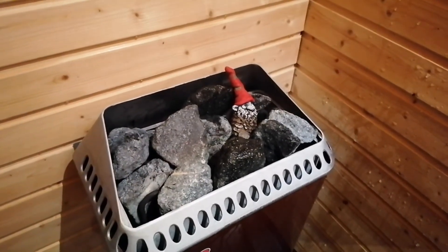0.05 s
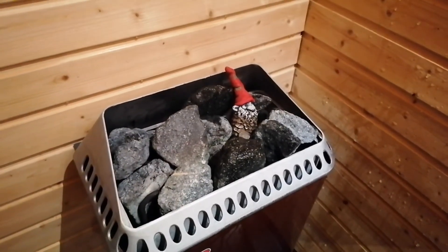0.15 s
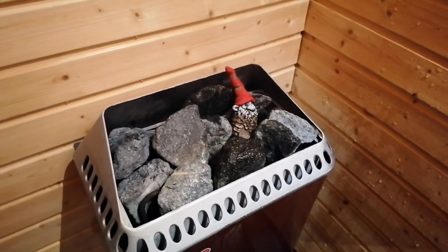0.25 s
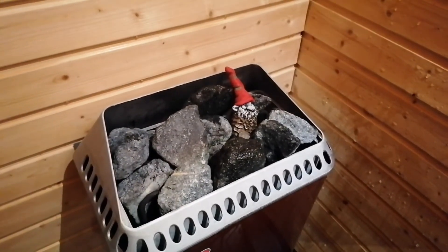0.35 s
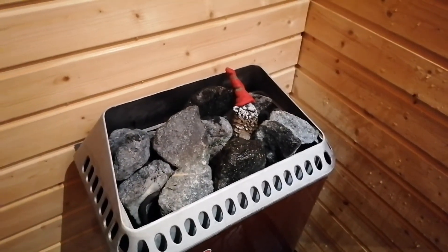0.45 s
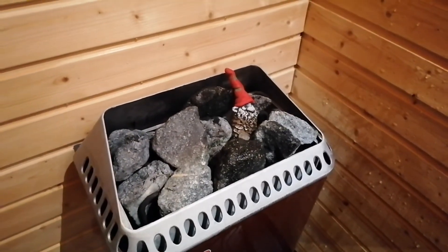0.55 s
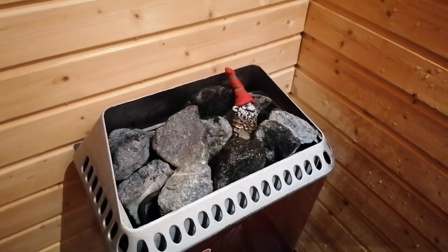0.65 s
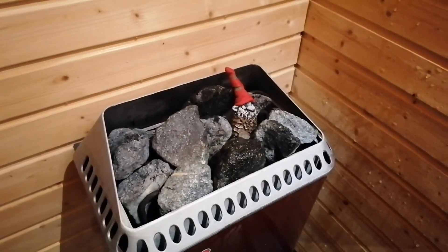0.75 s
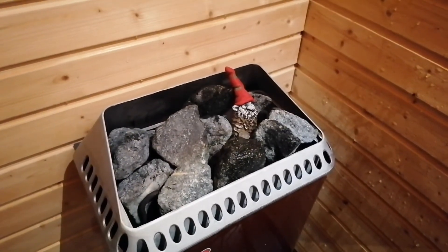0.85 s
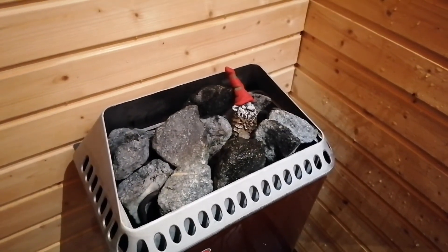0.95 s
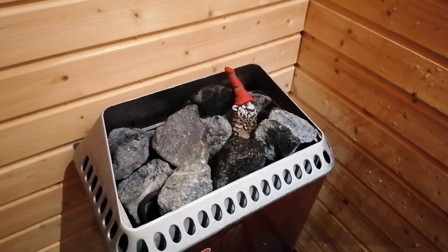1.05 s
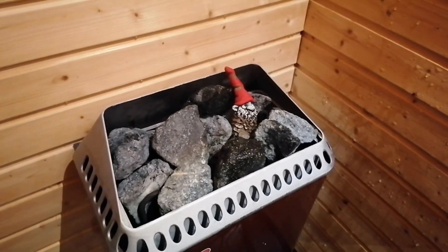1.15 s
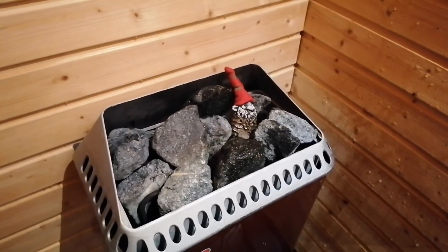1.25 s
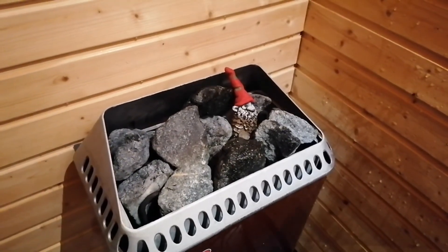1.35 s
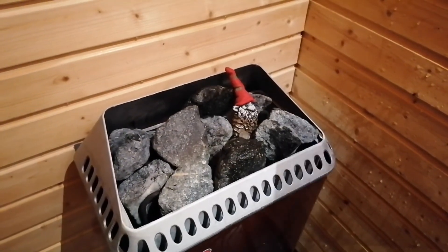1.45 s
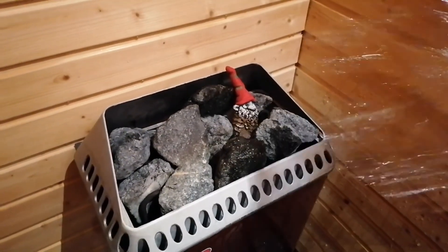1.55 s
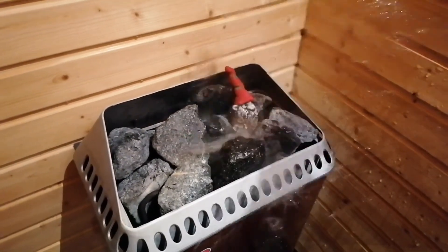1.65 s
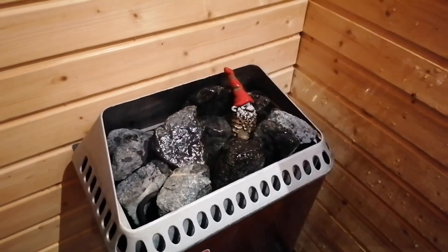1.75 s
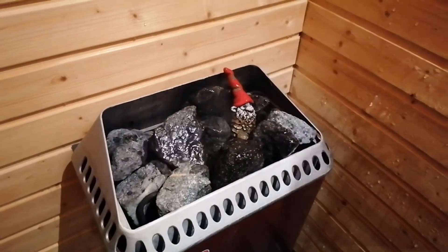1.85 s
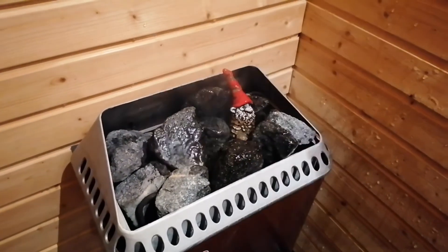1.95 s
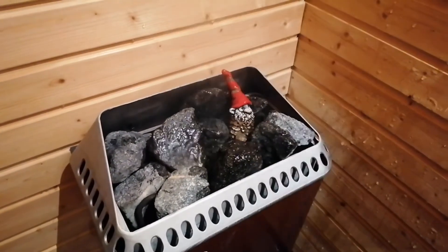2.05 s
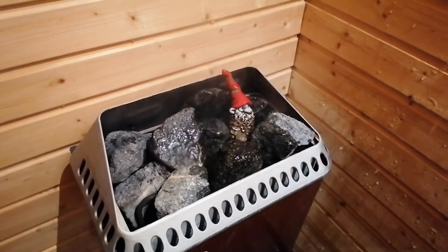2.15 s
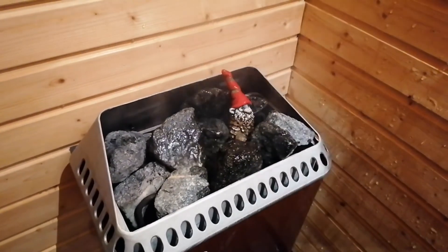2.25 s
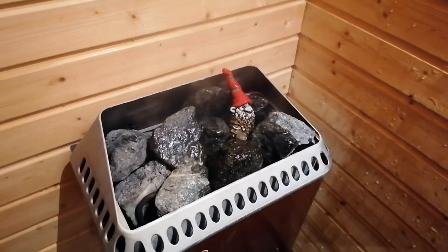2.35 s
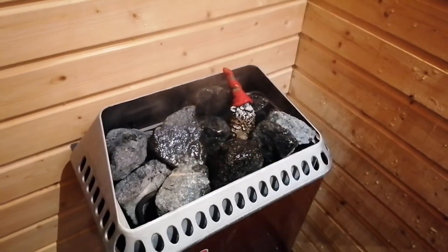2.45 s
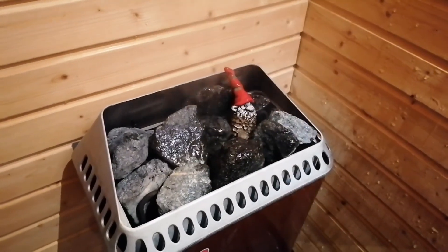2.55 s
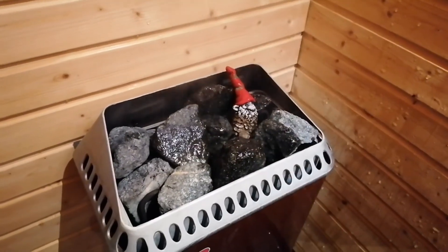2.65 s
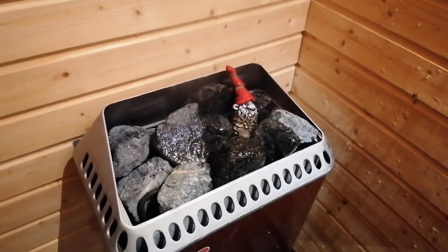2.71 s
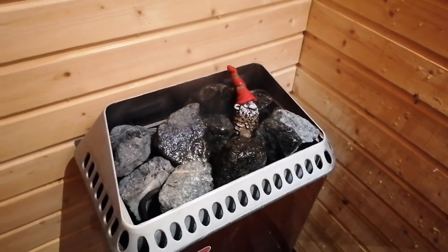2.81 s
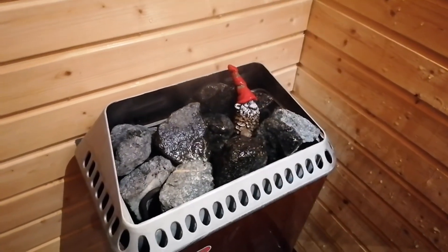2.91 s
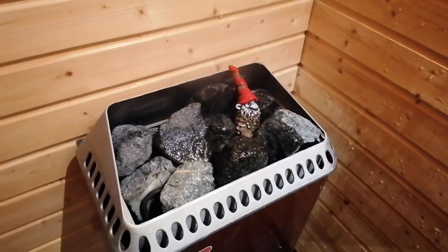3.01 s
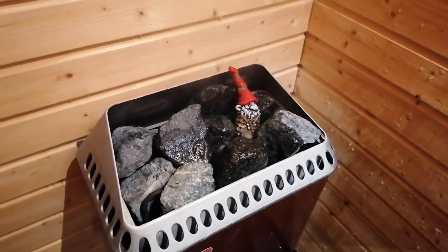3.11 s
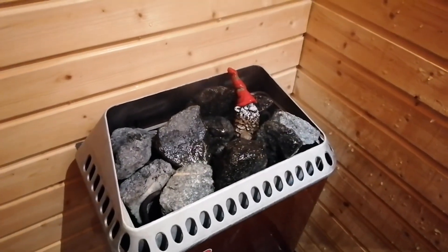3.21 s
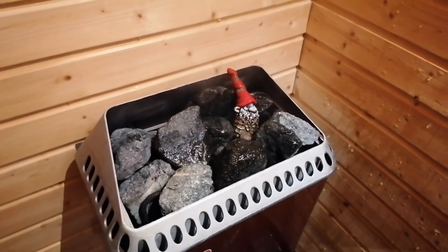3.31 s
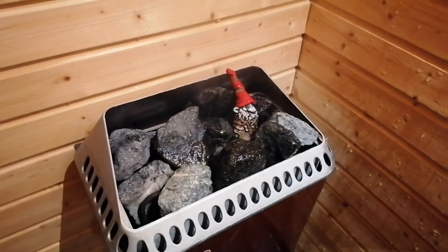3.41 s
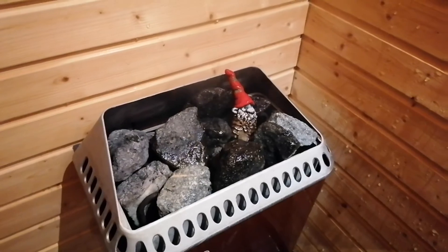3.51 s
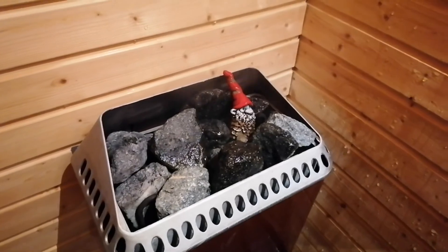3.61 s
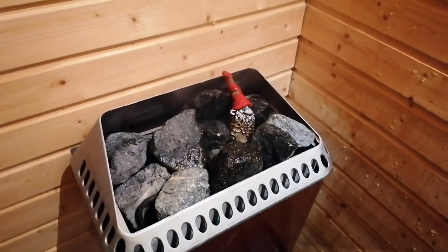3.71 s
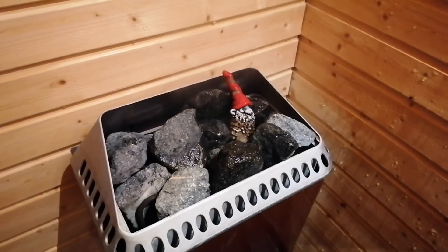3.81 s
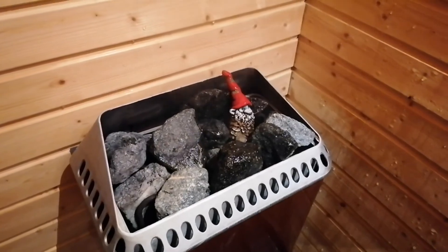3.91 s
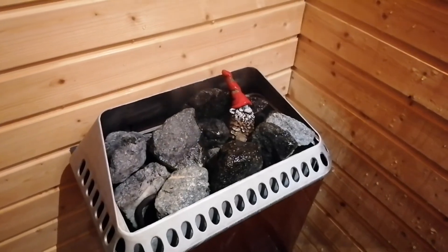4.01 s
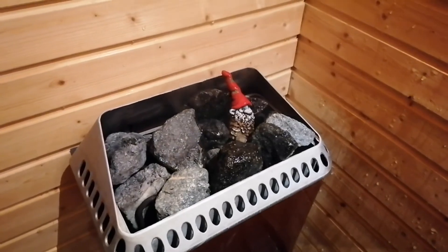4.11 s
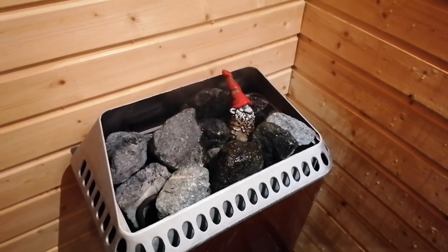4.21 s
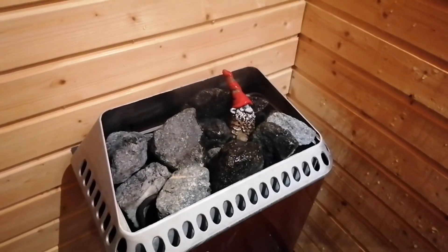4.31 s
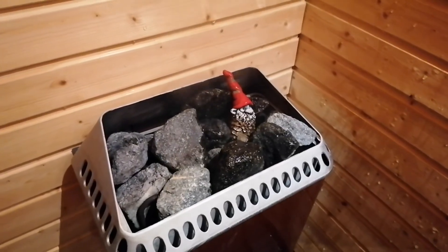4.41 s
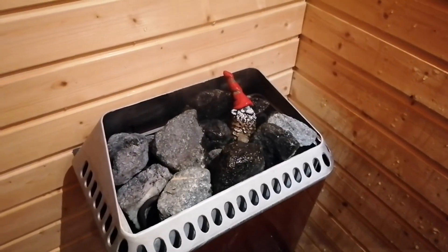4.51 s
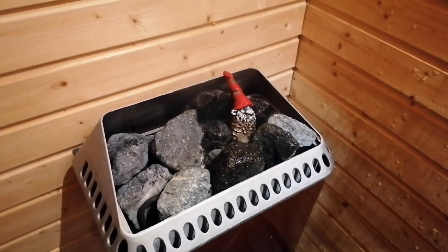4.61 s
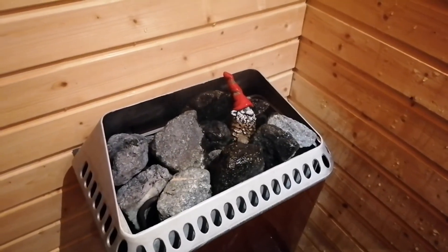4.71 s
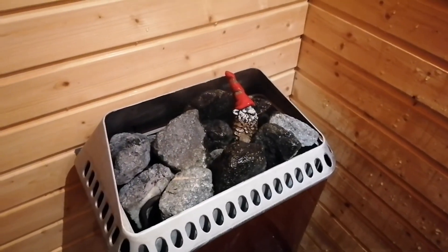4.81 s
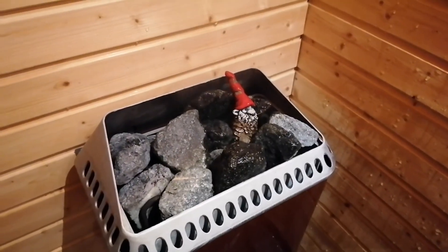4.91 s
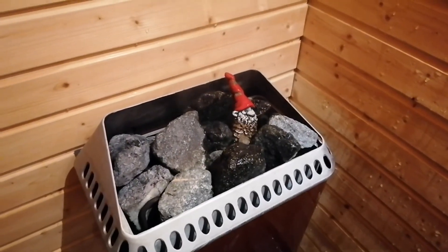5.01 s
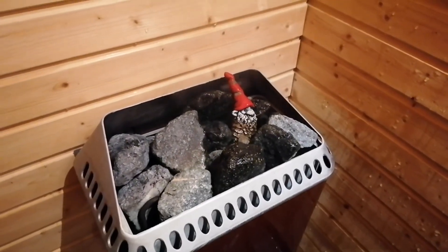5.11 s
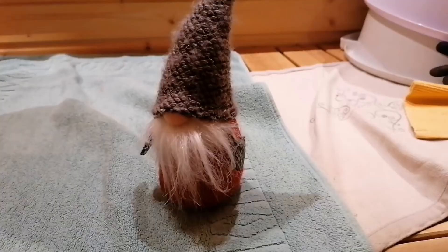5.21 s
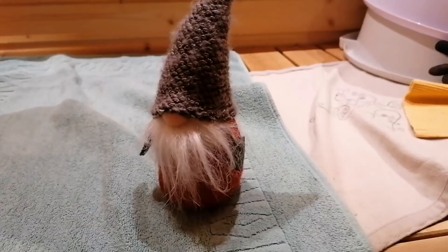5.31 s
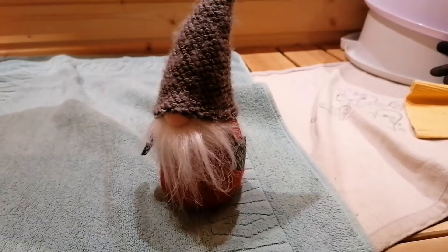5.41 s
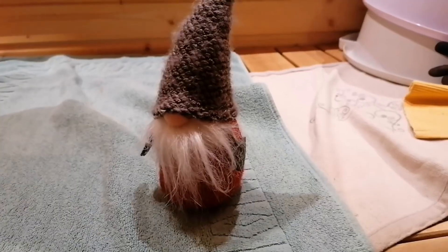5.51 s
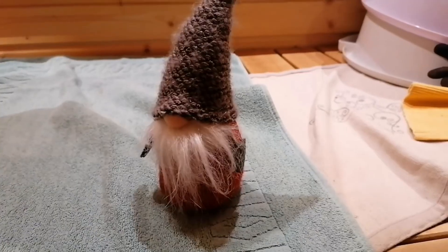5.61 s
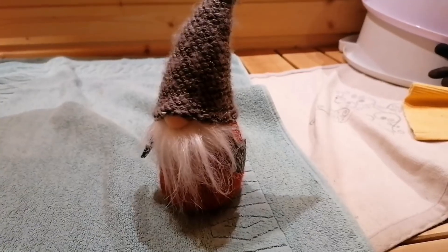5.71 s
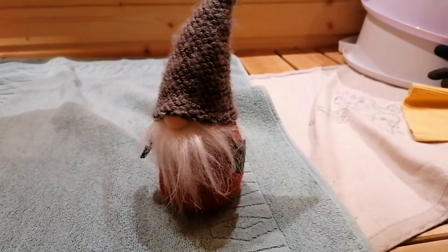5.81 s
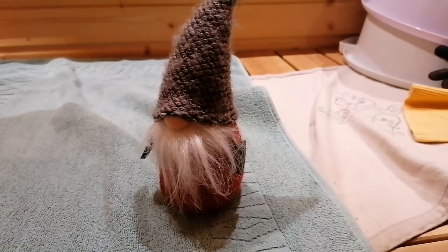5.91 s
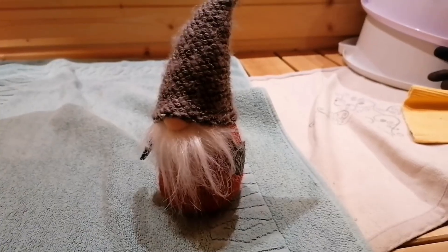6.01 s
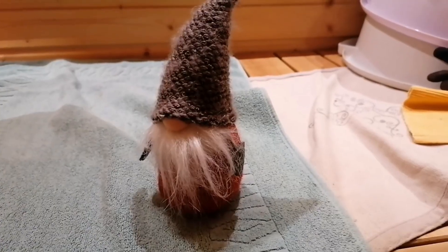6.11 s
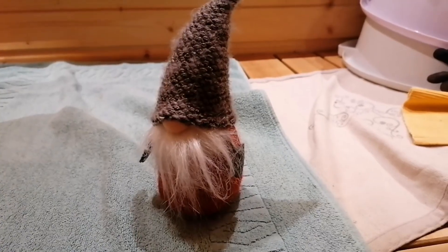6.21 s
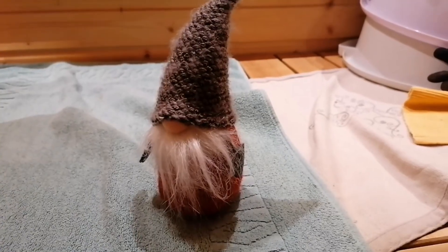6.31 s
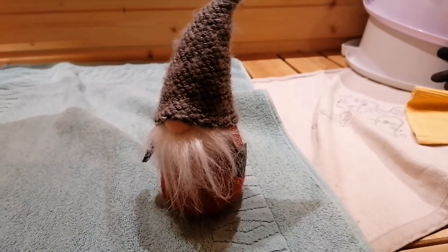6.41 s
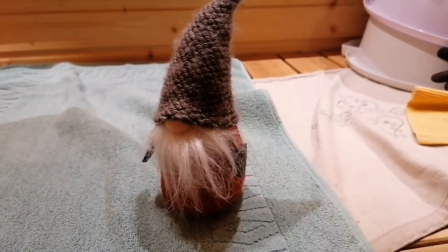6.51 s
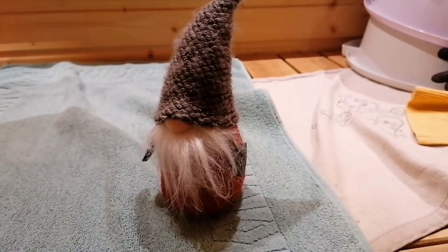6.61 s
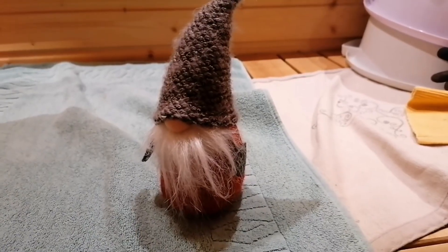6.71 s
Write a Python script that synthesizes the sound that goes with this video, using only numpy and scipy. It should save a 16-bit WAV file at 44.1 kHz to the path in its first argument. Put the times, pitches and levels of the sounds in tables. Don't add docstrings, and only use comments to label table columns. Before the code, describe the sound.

Close to a sauna heater, hot stones hiss very faintly. A few soft wooden knocks, then water lands with an abrupt sizzling splash and bubbling low gurgles. A ladle drags over hollow wood in two groaning scrapes, followed by a firm knock. The steam thins amid lighter knocks. Sound drops out briefly, then a sharp click at the right opens a much quieter bench view with faint hiss and ticks.

```python
import sys
import numpy as np
from scipy import signal
from scipy.fft import rfft, irfft, next_fast_len
from scipy.io import wavfile
from scipy.ndimage import uniform_filter1d

SR = 44100
rng = np.random.default_rng(int(sys.argv[2]) if len(sys.argv) > 2 else 0)


def to_wav(s):
    ch = np.atleast_2d(s).T
    pcm = np.round(np.clip(ch, -1, 1) * 32767)
    wavfile.write(sys.argv[1], SR, pcm.astype(np.int16))


def amplitude_ratio(level_db):
    exponent = np.asarray(level_db, float) / 20
    return 10 ** exponent


N = 297675
T = np.arange(N) / SR
SLOW = T[::64]
HZ = np.maximum(np.fft.rfftfreq(next_fast_len(N), 1 / SR), 1)
SIDES = np.array([[1], [-1]])
CUT_S, BACK_S, CLICK_S = 5.1628, 5.2224, 5.2786
AIR_HZ, TOP_HZ = 11000, 15200

# time in seconds, pressure in dB, locked pitch in Hz.
STROKE_1 = [
    (1.8, -60, 700),
    (1.83, -36, 700),
    (1.86, -24, 640),
    (1.91, -21.5, 618),
    (2.05, -22.5, 630),
    (2.165, -17.5, 683),
    (2.2, -23.5, 685),
    (2.266, -41, 640),
    (2.29, -50, 620),
]
DRAG_1 = dict(hollow_gain_db=4.96, loose_per_s=83, loose_reach=.395, lock_s=1.91)
DRAG_2 = dict(hollow_gain_db=-.5, loose_per_s=200, loose_reach=.4, lock_s=4)


def curves(table):
    s, *columns = np.transpose(table)
    return [np.interp(T, s, c) for c in columns]


def over(table, hz):
    table_hz, values = np.transpose(table)
    return np.interp(np.log(hz), np.log(table_hz), values)


def unit(x):
    return x / np.sqrt(np.mean(x ** 2))


def together(*db):
    return 10 * np.log10(sum(np.exp(d * np.log(10) / 10) for d in db))


def walk(rate):
    k = int(SR / rate)
    held = np.repeat(rng.standard_normal(N // k + 1), k)
    return uniform_filter1d(uniform_filter1d(held, k), k)[:N]


def band_pass(x, order, lo_hz, hi_hz):
    return signal.sosfilt(signal.butter(order, [lo_hz, hi_hz], "band", fs=SR, output="sos"), x)


def resonate(x, hz, width):
    return signal.lfilter(*signal.iirpeak(hz, hz / width, fs=SR), x)


def ring(at_s, modes, push_s):
    a = int(at_s * SR)
    t = np.maximum(T[a:int((at_s + .6) * SR)] - at_s, 0)
    tone = sum(amplitude_ratio(db - 60 * t / t60) * np.sin(2 * np.pi * hz * t) for hz, db, t60 in modes)
    out = np.zeros(N)
    out[a:a + len(t)] = tone * np.minimum(t / push_s, 1)
    return out


def puff(at_s, db, lo_hz, hi_hz, t60, like):
    a = int(at_s * SR)
    t = T[:min(int(t60 * SR), N - a)]
    noise = rng.standard_normal((2, SR // 2))[:, :len(t)]
    mid, side = band_pass(noise, 3, lo_hz, hi_hz)
    burst = unit(mid + np.sqrt((1 - like) / (1 + like)) * SIDES * side)
    out = np.zeros((2, N))
    out[:, a:a + len(t)] = burst * amplitude_ratio(db - 60 * t / t60) * np.minimum(t / (0.025 * t60), 1)
    return out


def spits(rate, spread_db, share):
    # frequency in Hz, left minus right in dB.
    left_lead = [(60, -2), (110, 0), (200, -1.5), (380, 1.5), (700, -0.5), (1290, 1.5), (2380, -3.5),
                 (4400, -4.5), (8120, 5), (15000, -6.5)]
    # frequency in Hz, share common to both microphones.
    likeness = [(60, 1), (130, 0.77), (290, 1), (640, 0.71), (1410, 0.074), (3100, 0.05), (6820, -0.46),
                (15000, -0.01)]
    n = next_fast_len(N)
    draw = rng.random((2, n))
    burst = (draw[0] < rate / SR) * amplitude_ratio(-spread_db * np.log(1 - draw[1]))
    burst = signal.lfilter([1], [1, -np.exp(-1 / (0.0006 * SR))], burst)
    mid, side = rfft(rng.standard_normal((2, n)) * (1 + share * unit(burst)))
    like = np.clip(over(likeness, HZ), 0, .98)
    pair = np.sqrt(1 + like) * mid + SIDES * np.sqrt(1 - like) * side
    return pair * amplitude_ratio(SIDES * over(left_lead, HZ) / 2)


def bands(spectrum, lo_hz, hi_hz, db, flicker_db):
    edges = np.geomspace(lo_hz, hi_hz, 1 + int(np.ceil(2 * np.log2(hi_hz / lo_hz))))
    out = 0
    for a, b in zip(edges, edges[1:]):
        band = irfft(spectrum * ((HZ >= a) & (HZ < b)), next_fast_len(N))[:, :N]
        out = out + band * amplitude_ratio(flicker_db * walk(12))
    return out / np.sqrt(np.mean(out.mean(axis=0) ** 2)) * amplitude_ratio(db)


def colour(table):
    # centre in Hz, width in Hz, boost in dB.
    port = [(2580, 500, 2), (5000, 750, 1), (7470, 290, 2.5), (9416, 550, 6), (15000, 550, 3)]
    boost_db = sum(db / (1 + ((HZ - hz) / width) ** 2) for hz, width, db in port)
    return amplitude_ratio(over(table, HZ) + boost_db)


def gurgle(peaks_s, levels_db, fade_db_per_s):
    swell_db_per_s = 150
    each = []
    for s, db in zip(peaks_s, levels_db):
        loss_db = np.where(SLOW < s, swell_db_per_s * (s - SLOW), fade_db_per_s * (SLOW - s))
        each.append(db - loss_db)
    return np.interp(T, SLOW, together(*each))


def stones():
    # time in seconds, treble level in dB.
    steam_level = [(0.0, -57.5), (1.65, -63), (1.7, -64), (1.718, -43), (1.76, -37), (1.82, -36.5),
                   (1.98, -40.5), (2.27, -44.5), (2.35, -42), (2.82, -40.5), (3.79, -43), (4.55, -47),
                   (4.6, -48.5), (5.15, -49)]
    # frequency in Hz, level per Hz in dB.
    steam_colour = [(250, -47), (420, -18), (776, -11), (862, -13.5), (1030, -8.5), (1460, -10.5),
                    (1570, -7.5), (2860, 1.5), (3180, -3.5), (5130, -7), (6240, -12), (9350, -14.5),
                    (15100, -27)]
    # frequency in Hz, level per Hz in dB.
    splash_colour = [(250, -33), (420, 1), (476, -7.5), (850, -4.5), (972, -3), (1470, -6.5), (2320, 2),
                     (5000, -4), (6500, -36), (11000, -120)]
    # time in seconds, share of splash colour (0-1).
    fresh_share = [
        (1.69, 0.07),
        (1.71, 0.96),
        (1.9, 0.9),
        (2.25, .8),
        (2.45, 0),
    ]
    # peak time in seconds, rumble in dB, simmer above rumble in dB.
    gurgles = [(1.75, -46, 2), (1.88, -61.5, 28), (1.96, -56, 3), (2.17, -52, -6), (2.29, -64.5, 22),
               (2.47, -53, -3), (2.54, -63.5, 15.5), (2.86, -52.5, 4), (3.23, -60, 8), (3.93, -71, 18),
               (4.09, -64, -5), (4.63, -65.5, -2), (5.05, -71, 1)]
    simmer_hz, low_hz, body_hz, treble_hz = 140, 420, 1800, 5000
    hum_db, edge_rasp_db = -81.5, -22.5

    steam_db, = curves(steam_level)
    second_modes_db = handling(STROKE_1, **DRAG_1)[1]
    treble_db = together(steam_db, second_modes_db + edge_rasp_db)
    peaks_s, deep_db, high_db = np.transpose(gurgles)
    rumble_db = together(hum_db, steam_db - 28.5, gurgle(peaks_s, deep_db, 62.5))
    simmer_db = together(steam_db - 16.5, gurgle(peaks_s, deep_db + high_db, 170))
    fresh = np.clip(curves(fresh_share)[0], 0, 1)

    noise = spits(900, 3.0, 0.14)
    hiss = noise * colour(steam_colour)
    splash = noise * amplitude_ratio(over(splash_colour, HZ))
    steam = bands(hiss, treble_hz, AIR_HZ, treble_db, .8)
    steam = steam + bands(hiss, AIR_HZ, TOP_HZ, steam_db - 13.5, .8)
    for source, share in ((hiss, 1 - fresh), (splash, fresh)):
        steam = steam + share * bands(source, body_hz, treble_hz, treble_db + 3, 1.0)
        steam = steam + share * bands(source, low_hz, body_hz, steam_db - 6, 1.5)

    pocket = 1 + 3.4 / np.hypot(1, (HZ - 264) / 30)
    casing = .45 + .9 / (1 + ((HZ - 100) / 45) ** 2)
    simmer = bands(noise * pocket, simmer_hz, low_hz, simmer_db, 2.5)
    rumble = bands(noise * casing, 17, simmer_hz, rumble_db, 2.1)
    return steam + rumble + simmer


def knocks():
    # time in seconds, peak in dB, brightness (0-1).
    knock_list = [(1.384, -52.5, 0.5), (1.52, -51.5, 0.5), (1.625, -45, 0.26), (1.648, -48, 0.2),
                  (2.81, -22, 0.35), (2.829, -28, 0.36), (3.918, -32, 0.45), (3.97, -44, 0.3),
                  (4.369, -45.5, 0), (4.539, -39, 0.3), (4.574, -42, 0.3)]
    # frequency in Hz, level in dB, t60 in seconds.
    board = [(153.6, -3, 0.17), (265, 2.5, 0.07), (400, 3, 0.097), (516.7, 8.5, 0.17), (775, 12.5, 0.075),
             (1144, 14, 0.039)]
    out = 0
    for s, db, bright in knock_list:
        modes = []
        for hz, g, t60 in board:
            m = rng.standard_normal()
            dull_db = (1 - bright) * 6 * np.log2(hz / 300)
            modes.append((hz * (1 + 0.034 * m), db - 16.0 + g + 2 * m - dull_db, t60))
        scatter = puff(s, db - 15.0, 143, 500 + 1200 * bright, 0.33, 0.64)
        out = out + ring(s, modes, 0.0023) + scatter
    return out


def handling(table, hollow_gain_db, loose_per_s, loose_reach, lock_s):
    # time in seconds, gain in dB.
    grips = [
        (1.922, 6),
        (1.948, 4),
        (1.995, 4),
        (2.05, -3),
        (2.12, 1),
        (2.164, -6.5),
        (2.197, 10),
        (2.24, 7),
        (2.49, 9.5),
    ]
    grip_s, wake_s = .014, .11
    wake_hz, wake_width_hz = 640, 16.1
    pressure_db, lock_hz = curves(table)
    grip_db = sum(db * np.exp(-((SLOW - s) / grip_s) ** 2) for s, db in grips)
    grip_db = np.interp(T, SLOW, grip_db)
    awake = (T > min(lock_s, table[0][0] + wake_s)) / (1 + np.exp((wake_hz - lock_hz) / wake_width_hz))
    hollow_db = pressure_db + hollow_gain_db + grip_db
    second_db = pressure_db - 7 + 10.5 * awake - .3 * grip_db
    upper_db = pressure_db - 1.2
    loose = T < lock_s
    return hollow_db, second_db, upper_db, lock_hz, np.where(loose, loose_reach, .1), np.where(loose, loose_per_s, 290)


def stroke(table, drag, wood):
    a, b = int(table[0][0] * SR), int(table[-1][0] * SR)
    *levels_db, lock_hz, reach, rate = (c[a:b] for c in handling(table, **drag))
    uneven_rate = rate * amplitude_ratio(3.0 * walk(40)[a:b])
    slip = np.diff(np.floor(np.cumsum(uneven_rate / SR)), prepend=0)
    slip = slip * amplitude_ratio(3.9 * rng.standard_normal(b - a))
    rasp = signal.lfilter([1], [1, -np.exp(-1 / (0.001835 * SR))], slip)
    mid, side = rng.standard_normal((2, b - a)) * (0.621 + unit(rasp))
    out = np.zeros((2, N))
    for k, (db, modes, like, steady) in enumerate(zip(levels_db, wood, (.85, .3, .02), (.8, .5, .3))):
        drive = np.sqrt(1 + like) * mid + SIDES * np.sqrt(1 - like) * side
        rung, power = 0, 0
        for hz, width, g, pan_db in modes:
            mode = unit(resonate(resonate(drive, hz, 3 * width), hz, width))
            swing = uniform_filter1d(mode ** 2, int(4 * SR / hz))
            mode = unit(mode / (swing + .02) ** (steady / 2))
            mode = unit(resonate(mode, hz, 4 * width))
            near = amplitude_ratio(g)
            if k == 0:
                distance = np.log(hz / lock_hz) / np.maximum(reach, .03)
                near = near * (np.exp(-distance ** 2) + 0.023)
            rung = rung + mode * near * amplitude_ratio(SIDES * pan_db / 2)
            power = power + near ** 2
        out[:, a:b] += rung / np.sqrt(power) * amplitude_ratio(db)
    rattle = band_pass(mid + .8 * SIDES * side, 2, 750, 2000)
    out[:, a:b] += unit(rattle) * amplitude_ratio(levels_db[2] + 0.5)
    return out * np.interp(T, [a / SR, a / SR + 0.0072, b / SR - .015, b / SR], [0, 1, 1, 0])


def click():
    # frequency in Hz, level in dB, t60 in seconds.
    body_modes = [(518, -28.5, 0.034), (844, -14, 0.015), (1039, -16, 0.013), (1697, 1.5, 0.01),
                  (1957, -12, 0.0099), (3476, -13, 0.0084), (4710, -42, 0.0056), (12970, -12, .0012)]
    drive_db, ceiling = 2, 1.1
    tap = ceiling * np.tanh(ring(CLICK_S, body_modes, .00005) * amplitude_ratio(drive_db) / ceiling)
    tap = signal.sosfilt(signal.butter(4, 430, "high", fs=SR, output="sos"), tap)
    leak = ring(CLICK_S + .005, [(1748, -49.5, 0.039)], .001) * np.array([[1], [.3]])
    return tap * amplitude_ratio(np.array([[-32], [-1.5]])) + leak


def far_hiss():
    # frequency in Hz, level per Hz in dB.
    bench_colour = [(15, -31), (25, -10.5), (163, -10.5), (232, -15), (287, -7.5), (418, -8), (677, -12),
                    (986, -6), (1100, -12), (1430, -7), (1780, -8.5), (3770, -4), (5950, -11.5),
                    (11000, -17), (15200, -29)]
    duck_db, recover_s, fade_db_per_s = 11, .09, 4
    hiss = spits(300, 3.1, 0.18) * colour(bench_colour)
    since = np.maximum(T - CLICK_S, 0)
    db = -58 - fade_db_per_s * since - duck_db * np.exp(-since / recover_s)
    return bands(hiss, 22, AIR_HZ, db, 0.97) + bands(hiss, AIR_HZ, TOP_HZ, db - 17.5, .8)


def ticks():
    # time in seconds, peak in dB, low edge in Hz, high edge in Hz, t60 in seconds.
    tick_list = [
        (5.4033, -40, 1100, 3560, .03),
        (5.408, -49, 1100, 3200, 0.24),
        (5.945, -59, 3500, 14030, 0.17),
        (6.742, -54, 400, 3000, 0.13),
    ]
    return sum(puff(*row, 0.19) for row in tick_list)


def whistle(start_s, end_s, start_hz, end_hz, db):
    hz = np.interp(T, [start_s, end_s], [start_hz, end_hz]) * (1 + .012 * walk(15))
    swell = np.interp(T, [start_s, start_s + .02, end_s - .06, end_s], [0, 1, .7, 0])
    return swell * amplitude_ratio(db + 5.0 * walk(17)) * np.sin(2 * np.pi * np.cumsum(hz) / SR)


def bench():
    # start in seconds, end in seconds, start pitch in Hz, end pitch in Hz, level in dB.
    whistles = [
        (5.41, 5.62, 2083, 2080, -64.5),
        (5.45, 6.124, 3853, 3835, -73.5),
        (6.1, 6.399, 9270, 10950, -75),
    ]
    quiet = far_hiss() + ticks() + sum(whistle(*row) for row in whistles)
    return quiet * (T > CLICK_S) + click()


def scene():
    # time in seconds, pressure in dB, locked pitch in Hz.
    stroke_2 = [
        (2.29, -42, 700),
        (2.312, -37.5, 700),
        (2.384, -28.5, 680),
        (2.425, -26, 560),
        (2.468, -31, 420),
        (2.49, -39, 400),
        (2.54, -54, 400),
    ]
    # mode in Hz, width in Hz, level in dB, left minus right in dB.
    wood_1 = [
        [(351, 123, -6.5, -2.5), (470, 60, -4.5, 0.5), (626, 20, -1.5, -7.5), (715.3, 55.2, 0, -2),
         (792.6, 36, -2.5, -6.5)],
        [(1041, 49, -3.5, 0.5), (1118, 39, -3.5, 2.5)],
        [(1230, 56, -5, -1.5), (1398, 56, -1.5, 4.5), (1693, 69.5, -3, 6), (1906, 44, -2, 6),
         (1961, 45, -3, -2.5), (2210, 72, -10.5, 2), (2559, 29.82, -12.5, 5), (2710, 41, -14.5, 0.5),
         (3266, 67, -12.5, -4.5), (3392, 63, -14, -9.5), (3667, 84, -17, 0)],
    ]
    wood_2 = [
        [(350, 41, 0, -1.4), (416.5, 33, 0.047, -1.4), (569.6, 32, -0.56, -0.68), (751, 30, 0, -2)],
        [(920, 77, 1.7, 0), (1156, 42, 2.5, 0)],
        [(1542, 91, 0, 2), (1645, 93, -2, 1), (2300, 69, -8.5, 2.5), (3500, 237, -22, -3)],
    ]
    strokes = stroke(STROKE_1, DRAG_1, wood_1) + stroke(stroke_2, DRAG_2, wood_2)
    stove = stones() + knocks() + strokes
    on = (T < CUT_S) + amplitude_ratio(3.0) * ((T > BACK_S) & (T < CLICK_S))
    return 1.177 * np.tanh(stove / 1.228) * on + bench()


def low_pass(x):
    return signal.sosfilt(signal.butter(12, 16490, fs=SR, output="sos"), x)


def record(dry):
    return low_pass(dry)


dry = scene()
out = record(dry)
to_wav(out)
```